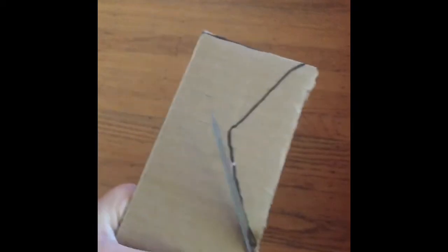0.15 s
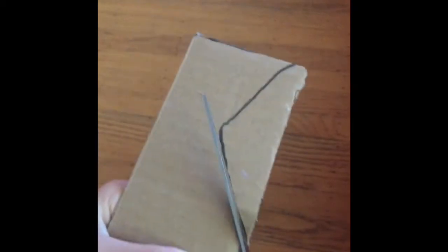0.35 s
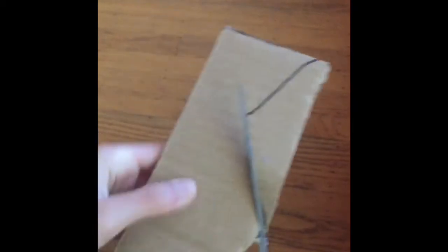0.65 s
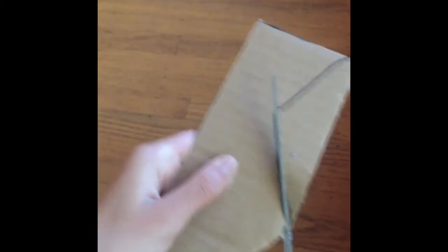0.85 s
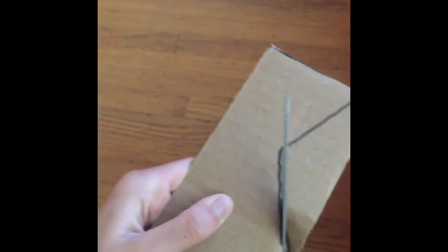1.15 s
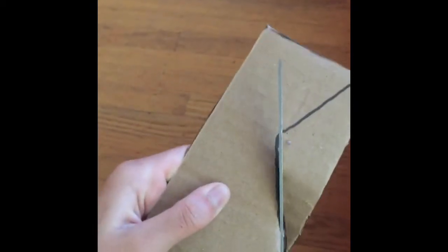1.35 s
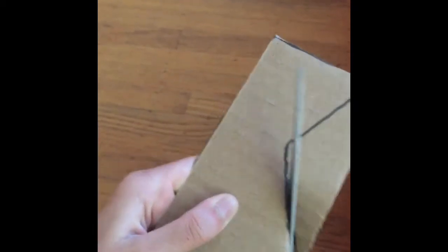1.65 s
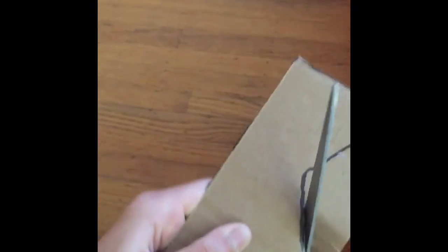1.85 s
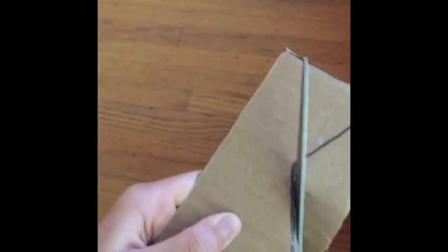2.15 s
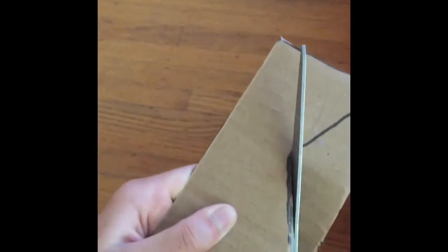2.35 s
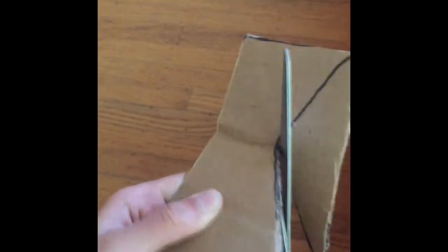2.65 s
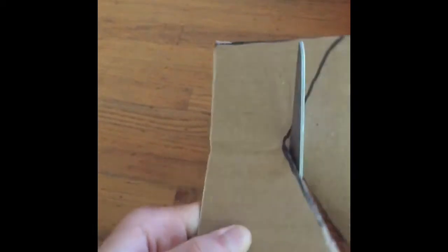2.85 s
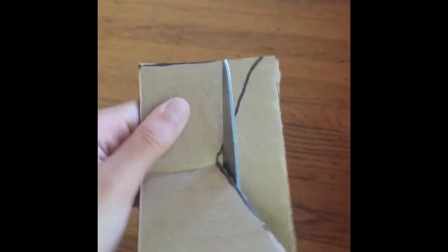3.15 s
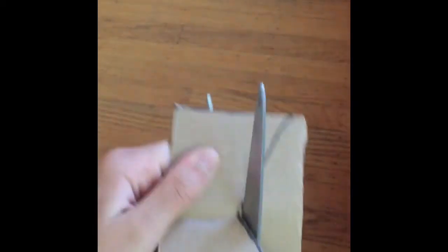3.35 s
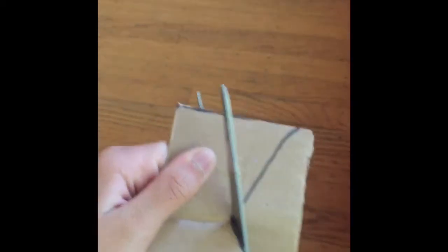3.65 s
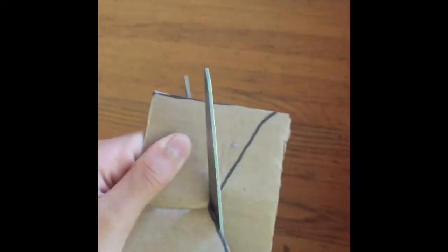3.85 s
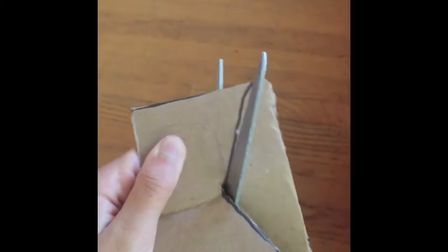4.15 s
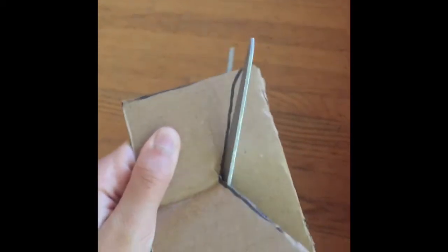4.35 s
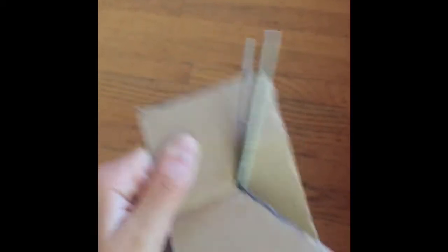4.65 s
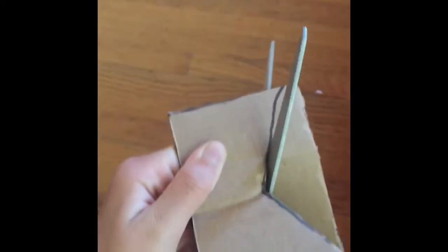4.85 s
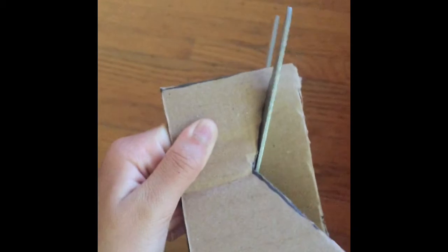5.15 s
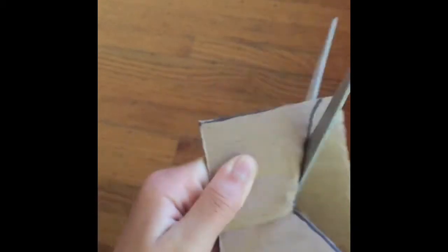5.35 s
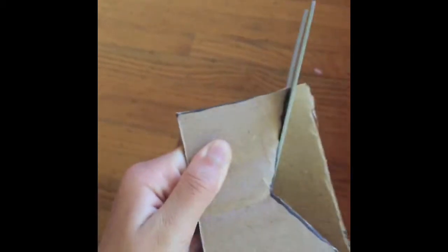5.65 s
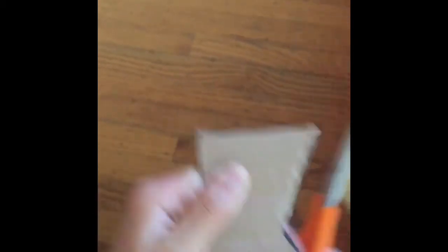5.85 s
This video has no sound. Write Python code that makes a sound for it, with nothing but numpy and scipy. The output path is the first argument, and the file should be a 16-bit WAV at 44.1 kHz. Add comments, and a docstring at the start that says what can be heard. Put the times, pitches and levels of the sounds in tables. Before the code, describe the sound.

Close, dry sound of scissors cutting corrugated cardboard in a small quiet room. A short, bright rasp at 0.1 s leads into a slow crunching cut from 0.4 to 0.7 s, with hard snaps near 0.46. A dull knock at 0.75, a sliding scrape at 0.95, then a fuller crunch from 1.2 to 1.5. A short scrape at 1.7 runs into a snap at 1.86; a long crackling cut follows from 2.15 to 2.5, with metal ticks and a strong snap at 2.38. Handling from 2.6 to 3.2: light scuffs, deep soft thumps, knocks at 2.84 and 3.2, a tiny chirping squeak at 2.95. Rasp at 3.35, then a faint thin squeal and very bright clicks and snap at 3.75-3.85. Swishing rasps at 4.1, 4.7 and 5.3 precede crackling cuts around 4.4, 5.0 and 5.5, the sharpest snap at 5.6. A final snap-cluster at 5.8 ends with papery thumps and knocks.

```python
"""Scissors cutting corrugated cardboard

Steel scissors cut cardboard close by in a quiet room: sliding strokes rasp, closing strokes crunch and snap flutes.
Random fibre impulses and noise bursts drive filters that colour each stroke as the sheet does.
Decaying sines make the flexing sheet's thumps; noise bursts make steel ticks and dull knocks.
Filtered noise gives finger brushes and a thin squeal, a gliding sine gives the bent card's squeak.
A short reverberant tail and a faint noise floor surround them.
"""
import sys
import numpy as np
from scipy import signal
from scipy.fft import rfft, irfft, next_fast_len
from scipy.io import wavfile
from scipy.ndimage import map_coordinates

SR = 44100
rng = np.random.default_rng(int(sys.argv[2]) if len(sys.argv) > 2 else 0)


def materialize(psi):
    """Save the field psi as 16-bit PCM at rate SR to the path in sys.argv[1].

    A 1-D psi becomes a single channel; in a 2-D psi each row is a channel.
    """
    bounded = np.clip(np.atleast_2d(psi).T, -1, 1)
    quanta = np.round(bounded * 32767).astype(np.int16)
    wavfile.write(sys.argv[1], SR, quanta)


N = 264147
TIME = np.arange(N) / SR  # s
HZ = np.fft.rfftfreq(4096, 1 / SR)  # frequency grid of every filter
SPLIT_HZ, TOP_HZ = 4500, 16200  # border of body and hiss; upper band limit

# Strokes in which blade or card slides along the cut edge. Each row: start in seconds, swell in seconds,
# fade in seconds, body level in dB, hiss level in dB, swell depth in dB, fade depth in dB,
# dulling (hiss lost from start to end) in dB, glide of the body's resonances in octaves (negative falls),
# and the sheet's resonances and notches, each with centre in Hz, width in Hz, height in dB.
SLIDE_STROKES = [ (.067, 0.094, 0.073, -38.5, -36, 6, 6, 3.5, -0.018, [(514, 140, 20), (700, 640, -18),
                 (982, 140, 22.5), (1520, 230, 11), (6850, 2300, -4.5), (9400, 760, 6.5),
                 (12600, 1400, 10)]), (0.949, 0.15, 0.033, -37, -42, 3.5, 4, 11.5, -0.025, [(450, 145, -13),
                 (704, 140, 4), (924, 115, -14.5), (1167, 62, 9.5), (1360, 120, -11), (2680, 1380, -0.5)]),
                 (1.675, 0.01, 0.088, -38, -46.5, 6.5, 2, -9.5, -0.24, [(430, 120, -12), (910, 380, 18),
                 (950, 110, -33), (1790, 950, 5.5)]),
                 (2.624, 0.031, .015, -56, -51.5, 2, 7, -3, 1.4, [(3000, 2000, -8), (8700, 3100, -2)]),
                 (2.698, .025, .015, -40.5, -37.5, 5, 8, 0, -0.25, [(1788, 240, -14), (3130, 2300, -11),
                 (8870, 2700, 8.5)]),
                 (2.822, 0.12, 0.023, -40.5, -48.5, 4, 4.5, 12, 1.55, [(510, 1030, 14.5),
                 (1900, 2700, -15)]), (3.324, 0.061, 0.11, -35, -35, 4.5, 15, 3, 0.21, [(287, 570, 6.5),
                 (730, 360, -7.5), (2360, 400, 8), (3810, 470, 8), (5700, 1300, -6.5)]),
                 (3.985, 0.11, 0.12, -33.5, -37, 24.5, 21, 7, 0.12, [(415, 240, 15.5), (770, 270, 14),
                 (1690, 960, 10), (3900, 2000, 16)]),
                 (4.698, 0.033, 0.044, -31.5, -32.5, 7, 7.5, -3.5, -.12, [(406, 340, 18.5), (530, 390, -18),
                 (1144, 86, 7), (3670, 320, 8.5)]),
                 (5.314, 0.019, 0.06, -32.5, -29.5, 7, 7.5, -1, 0.13, [(520, 250, -7), (1050, 300, -5.5),
                 (2200, 750, -8), (5840, 10300, 10)]), ]
# Strokes in which the blades close. Each row: the same columns and units as for the sliding strokes.
CUT_STROKES = [ (.376, 0.004, 0.31, -43, -43, 4, 6.8, 8.5, 0.11, [(314, 166, -20.5), (670, 87, 2),
               (850, 200, -13), (1430, 98, -11), (2860, 840, -13.5), (3780, 720, -13.5)]),
               (1.225, 0.15, 0.14, -32.5, -33.5, 13, 19, 0, 0.59, [(248, 93, 13.5), (443, 287, -33.5),
               (917, 130, 14), (1920, 1400, 0), (5000, 1700, -4.5)]),
               (1.852, .01, 0.073, -41.5, -55, 7, 23.5, -9, 0, [(168, 75, 10.5), (332, 290, -13.5),
               (634, 990, 14.5), (976, 85, -25), (1830, 1000, 9.5)]),
               (2.13, 0.1, 0.257, -43, -44.5, 11.5, 0.91, 6, 0, [(284, 150, 11.5), (480, 170, -10.5),
               (1000, 410, 14.5), (1700, 490, 6), (3060, 310, 5.5)]),
               (3.69, 0.16, 0.042, -52, -47, 13.5, 6.6, -1, 0.29, [(980, 340, -11), (1510, 450, -13),
               (2170, 250, -12), (9300, 2000, -14)]),
               (4.345, 0.075, 0.13, -42, -40.5, 4.5, 3, 9, 0.42, [(305, 380, 1.6), (675, 290, 8.3),
               (1100, 69, 9.5), (5230, 6300, 9.9), (9580, 800, 3.4)]),
               (4.9, 0.16, 0.089, -42, -41.5, 12, 3.5, 2, 0, [(303, 120, 19), (744, 155, -16),
               (870, 330, 15.5), (1130, 220, -9.5), (2000, 1500, -3)]),
               (5.445, 0.13, 0.095, -43, -41, 11.5, 2.4, 2, 0, [(206, 78, 9), (400, 410, -9.5),
               (825, 170, 4.5), (1265, 340, -15.5), (1835, 160, 7), (10000, 6600, 2)]),
               (5.776, .015, 0.091, -47, -52, 0.5, 11, 3, 0, [(298, 160, -2), (1280, 1500, -9.5),
               (4300, 500, 5.5), (6160, 1000, 9), (11650, 3200, 11)]), ]
# Flutes give way. Each row: time in seconds, length in seconds, body level in dB, hiss level in dB.
FLUTE_SNAPS = [(0.379, 0.021, -41, -35.5), (0.459, 0.0056, -22.5, -25), (0.4814, 0.0069, -27, -27.5),
               (0.5086, .0085, -39.5, -36.5), (.559, 0.0066, -31.5, -29), (0.639, 0.0024, -39.5, -37),
               (0.684, 0.0042, -44, -43), (0.974, .0013, -25.5, -31.5), (1.232, 0.002, -38, -35),
               (1.3, 0.02, -41, -32.5), (1.3837, 0.0091, -29, -29), (1.4386, 0.008, -34.5, -43.5),
               (1.459, 0.0022, -31, -29.5), (1.464, 0.015, -39, -41), (1.498, 0.0053, -40, -42.5),
               (1.675, .01, -39, -36.5), (1.725, 0.0032, -29.5, -38), (1.855, 0.009, -26.5, -25),
               (1.867, 0.008, -26, -29), (2.165, 0.0087, -34.5, -31.5), (2.188, 0.0073, -41, -39),
               (2.2083, 0.0068, -42, -36.5), (2.235, 0.01, -38.5, -33), (2.261, .007, -34, -36),
               (2.283, .006, -50, -44), (2.309, 0.0058, -46, -47), (2.3282, .0027, -30.5, -28),
               (2.3805, 0.0058, -23, -23.5), (2.4512, 0.0056, -29, -27.5), (2.495, 0.0051, -39.5, -48),
               (3.8227, .0066, -27.5, -17.5), (3.849, 0.0074, -41, -32), (4.3437, 0.0079, -43.5, -40),
               (4.472, 0.015, -44, -38), (4.4866, 0.0048, -23.5, -23.5), (4.537, 0.0062, -32.5, -30.5),
               (4.555, 0.015, -38, -35.5), (4.9692, 0.0097, -27.5, -28.5), (5.076, .0093, -28, -34),
               (5.115, 0.0091, -46, -56), (5.156, .005, -38.5, -34.5), (5.4847, 0.0012, -29, -24.5),
               (5.5265, 0.011, -29.5, -26.5), (5.565, 0.0074, -37, -33.5), (5.6054, 0.0035, -19.5, -20.5),
               (5.7776, 0.004, -30, -25), (5.7902, 0.0049, -24.5, -20), (5.801, 0.0022, -32, -25)]
# The sheet flexes. Each row: start in seconds, nominal peak in dB, frequency in Hz, 60 dB decay time in seconds.
SHEET_THUMPS = [(0.48, -30, 124, 0.14), (0.562, -29, 178, 0.071), (1.863, -23.5, 84, 0.083),
                (2.167, -38.5, 238, 0.088), (2.38, -25.5, 268, 0.042), (2.384, -41.5, 135, 0.33),
                (2.448, -29.5, 86, 0.11), (2.803, -28.5, 47.6, 0.24), (3.205, -38, 108, 0.19),
                (3.334, -27.5, 48.3, 0.22), (3.401, -22, 276, 0.03), (3.823, -38, 154, 0.13),
                (3.86, -41, 59, 0.37), (4.493, -35, 124, 0.23), (4.504, -18.5, 294, 0.031),
                (4.973, -36, 280, 0.052), (5.08, -21, 305, 0.054), (5.446, -38, 218, 0.088),
                (5.533, -36.5, 195, 0.13), (5.826, -25.5, 182, 0.044), (5.869, -30, 190, 0.048)]
# The scissors knock against the card. Each row: start in seconds, peak in dB.
CARD_KNOCKS = [(0.745, -31), (2.838, -24.5), (3.2083, -24), (4.829, -24.5), (4.858, -32.5), (5.826, -20),
               (5.868, -24)]
# Fingers shift on the card, barely heard. Each row: start in seconds, length in seconds, nominal level in dB.
FINGER_BRUSHES = [(0.311, 0.052, -55), (0.714, 0.19, -61), (1.995, 0.043, -57), (3.031, 0.14, -60.5)]
# The steel edges catch on each other. Each row: start in seconds, nominal level in dB.
EDGE_TICKS = [(0.3336, -29.5), (2.115, -25.5), (2.2314, -13.5), (2.4743, -19), (3.674, -32),
              (3.7485, -11.5), (3.8419, -8.5), (3.8703, -25), (3.897, -28), (4.2192, -34), (4.2976, -30),
              (4.3625, -11), (4.4077, -20.5), (4.6324, -39), (4.6694, -30), (5.184, -23), (5.293, -33.5)]
# The bent card chirps. Each row: time in seconds, level in dB, mean frequency in Hz.
CHIRP_PATH = [(2.92, -44, 598), (2.942, -41, 642), (2.947, -21, 680), (2.953, -23.5, 703),
              (2.957, -28.5, 770), (2.99, -75, 686)]
# The closing blades squeal. Each row: time in seconds, level in dB.
SQUEAL_LEVELS = [(3.61, -93), (3.625, -58.5), (3.8, -53), (3.82, -74)]
# Resonances of that squeal. Each row: centre in Hz, half width in Hz, level in dB.
SQUEAL_RESONANCES = [(1336, 81, -3.5), (420, 33, -9.5)]
# Spectra of sliding, cutting, a knock and the noise floor. Each row: frequency in Hz, relative density in dB per Hz.
SLIDE_COLOUR = [(60, -6), (150, -7), (270, -14.5), (450, -7.5), (800, -3.5), (1800, 4.5), (3300, -2),
                (5000, -14.5), (7000, -11.5), (10000, -12.5), (13500, -18), (15700, -25.5)]
CUT_COLOUR = [(60, -2), (150, -1.5), (270, -5), (450, -6), (800, -8), (1800, -4.5), (3300, -3),
              (5000, -8.5), (7000, -5.5), (10000, -4), (13500, -5.5), (15700, -14)]
KNOCK_COLOUR = [(80, -10.5), (600, 2), (1150, -4.5), (1900, -8), (3000, -7.5), (16000, -26)]
FLOOR_COLOUR = [(20, -33), (45, -2.5), (115, -4.5), (700, -29), (1200, -25), (4800, -31), (12000, -31.5),
                (16000, -32.5)]
# The hand's push when sliding and when cutting. Entries: attack in seconds, bite in dB, arch as an exponent
# (1 = straight ramps), share of the effort's dB that the hiss follows, release in dB per second.
SLIDE_PUSH = dict(attack_s=.008, bite_db=12.5, arch=1.3, hiss_follows=1.11, release_db_per_s=491)
CUT_PUSH = dict(attack_s=.012, bite_db=15.5, arch=0.65, hiss_follows=0.9, release_db_per_s=487)

SHEET_RING_S = 0.11  # time computed past the end of a stroke
TICK_T60_S, TICK_CREST_DB, TICK_LOW_HZ = 0.0023, 1, 5000
TICK_RING_DB, TICK_RING_T60_S = -13, 0.021  # the blades shiver briefly after each catch
CHATTER_PER_S, CHATTER_DB, CHATTER_SCATTER_DB = 8, -42, 1  # fainter catches while the blades close


def cutting():
    """Brittle fracture: fibres part in uneven clumps and small tears, a dry crunch."""
    # rates per second
    grain = dict(rate=7400, scatter_db=6.5, clump_db=3.5, judder_rate=220, judder_db=3.0,
                 tear_rate=85, tear_db=-1.5, tear_s=0.0034)
    return sum(stroke(movement, CUT_COLOUR, grain, CUT_PUSH) for movement in CUT_STROKES)


def sliding():
    """Friction: dense, even slips make a smooth rasp with a few small catches."""
    # rates per second
    grain = dict(rate=16000, scatter_db=1.5, clump_db=1.0, judder_rate=170, judder_db=1.5,
                 tear_rate=15, tear_db=-6, tear_s=0.00075)
    return sum(stroke(movement, SLIDE_COLOUR, grain, SLIDE_PUSH) for movement in SLIDE_STROKES)


def stroke(row, spectrum, grain, hand):
    """Source and filter: fibre crackle and snaps are radiated as the sheet's body and the edge's hiss."""
    start, swell_s, fade_s, body_db, hiss_db, swell_db, fade_db, dulling_db, glide, colour = row
    end = start + swell_s + fade_s
    t = np.arange(start - 2 * hand["attack_s"], end + SHEET_RING_S, 1 / SR)
    effort_db = push(t, start, swell_s, fade_s, swell_db, fade_db, hand)
    progress = np.interp(t, [start, end], [-1 / 2, 1 / 2])
    body_level_db = body_db + effort_db
    hiss_level_db = hiss_db + hand["hiss_follows"] * effort_db - dulling_db * progress

    resonances_db = sum(db / (1 + (2 * (HZ - hz) / width) ** 2) for hz, width, db in colour)
    # The many higher modes ripple differently in every stroke
    crowded_modes_db = 2.4 * wobble(SR / 13, len(HZ)) * HZ / (HZ + 500) / np.hypot(1, HZ / 8000)
    sheet = amp(along(spectrum) + resonances_db + crowded_modes_db)
    body_share = 1 / (1 + (HZ / SPLIT_HZ) ** 12)
    hiss_share = (1 - body_share) * (HZ < TOP_HZ + 500)

    # Stick and slip shakes both bands
    judder = unit(amp(grain["judder_db"] * wobble(grain["judder_rate"], len(t))))
    judder = judder * tears(len(t), grain)
    bands = [(body_level_db, body_share, .22, glide), (hiss_level_db, hiss_share, 0, 0)]
    sound = 0
    for band, (level_db, share, woodiness, band_glide) in enumerate(bands):
        crackle = fibres(len(t), grain["rate"], grain["scatter_db"], 900, grain["clump_db"])
        force = crackle * judder * amp(level_db)
        for at, length, *snap_db in FLUTE_SNAPS:
            if t[0] <= at < end + hand["attack_s"]:
                add(force, at - t[0] - length, amp(snap_db[band]) * burst(length, woodiness))
        sound = sound + radiate(force, sheet, np.sqrt(share), band_glide)
    track = np.zeros(N)
    add(track, t[0], sound)
    return track


def push(t, start, swell_s, fade_s, swell_db, fade_db, hand):
    """Applied force, in dB under its peak: the blades bite, the push swells and fades, the hand lets go."""
    peak, end = start + swell_s, start + swell_s + fade_s
    swell = swell_db * np.clip((peak - t) / swell_s, 0, 1) ** hand["arch"]
    fade = fade_db * np.clip((t - peak) / fade_s, 0, 1) ** hand["arch"]
    attack = hand["bite_db"] * np.maximum(start - t, 0) / hand["attack_s"]
    release = hand["release_db_per_s"] * np.maximum(t - end, 0)
    return -(attack + swell + fade + release)


def fibres(size, rate, scatter_db, clump_rate, clump_db):
    """Random impulse process: tiny breaks or slips of fibres, uneven in size and swelling in clumps; rms 1."""
    breaks = (rng.random(size) < rate / SR) * rng.choice([-1, 1], size)
    sizes_db = scatter_db * rng.standard_normal(size) + clump_db * wobble(clump_rate, size)
    return unit(breaks * amp(sizes_db))


def tears(size, grain):
    """Relaxation: each small tear raises the force at a random moment, then dies away; rms 1."""
    happens = rng.random(size) < grain["tear_rate"] / SR
    jumps = happens * amp(grain["tear_db"] + 1.47 * rng.standard_normal(size))
    memory = np.exp(-1 / (grain["tear_s"] * SR))
    return unit(1 + signal.lfilter([1], [1, -memory], jumps))


def burst(length, woodiness):
    """Avalanche: breaks swell fast, die slower and ring their flute; energy of rms 1 over one length."""
    u = np.arange(int(3 * length * SR) + 2) / (length * SR) - 3 / 2  # time in lengths
    crackle = rng.standard_normal(len(u)) / (np.exp(-u / 0.32) + np.exp(u / 0.41))
    flute_hz = np.clip(1500 * 2 ** (.5 * rng.standard_normal()), 750, 6000)
    flute = signal.lfilter(*signal.iirpeak(flute_hz, 3, fs=SR), crackle)
    crackle = unit(crackle) + woodiness * unit(flute)
    return unit(crackle) / np.sqrt(3)  # the burst spans three lengths


def radiate(force, gain, share, glide):
    """Resonant radiation: modes shift by glide octaves during the stroke, up or down."""
    if glide == 0:
        return signal.fftconvolve(force, response(gain * share))
    stages = np.linspace(-1 / 2, 1 / 2, 9)
    progress = np.linspace(-1 / 2, 1 / 2, len(force))
    sound = 0
    for stage, weight in zip(stages, np.eye(len(stages))):
        crossfade = np.interp(progress, stages, weight)
        shifted = np.interp(HZ / 2 ** (glide * stage), HZ, gain)
        sound = sound + signal.fftconvolve(force * crossfade, response(shifted * share))
    return sound


def ticks():
    """Impact of edge on edge: tiny bright clicks, with a faint random chatter during the cuts."""
    track, t = np.zeros(N), np.arange(SR // 50) / SR
    decay = amp(-60 * t / TICK_T60_S) + amp(TICK_RING_DB - 60 * t / TICK_RING_T60_S)
    chatter = []
    for start, swell_s, fade_s, *_ in CUT_STROKES:
        for _ in range(int(CHATTER_PER_S * (swell_s + fade_s))):
            at = rng.uniform(start, start + swell_s + fade_s)
            chatter.append((at, rng.normal(CHATTER_DB, CHATTER_SCATTER_DB)))
    for s, db in list(EDGE_TICKS) + chatter:
        add(track, s, amp(db - TICK_CREST_DB) * decay * rng.standard_normal(len(t)))
    return signal.sosfilt(signal.butter(2, TICK_LOW_HZ, "highpass", fs=SR, output="sos"), track)


def thumps():
    """Free bending vibration: the released sheet swings in a low mode with a weaker, shorter overtone."""
    track, t = np.zeros(N), np.arange(SR // 2) / SR
    for s, db, hz, t60 in SHEET_THUMPS:
        overtone = 0.26 * np.sin(2 * np.pi * 1.607 * hz * t) * amp(-30 * t / t60)
        swing = np.sin(2 * np.pi * hz * t) + overtone
        onset = 1 - np.exp(-t * hz / 0.48)
        # 1 dB makes up for the soft onset
        add(track, s, amp(db + 1.0 - 60 * t / t60) * onset * swing)
    return track


def knocks():
    """Damped impact: dull taps of steel on card, rattling for a few milliseconds."""
    track, t = np.zeros(N), np.arange(SR // 20) / SR
    card = response(amp(along(KNOCK_COLOUR)))
    for s, db in CARD_KNOCKS:
        rattle = rng.standard_normal(len(t)) * amp(-60 * t / 0.021)
        tap = signal.fftconvolve(rattle, card)
        add(track, s, amp(db) * tap / np.abs(tap).max())
    return track


def squeaks():
    """Stick-slip oscillation: the bent card chirps against the blade; later the closing blades squeal thinly."""
    s, db, hz = np.transpose(CHIRP_PATH)
    unsteady_hz = np.interp(TIME, s, hz) * (1 + 0.04 * wobble(300, N))
    chirp = envelope(s, db) * np.sin(2 * np.pi * np.cumsum(unsteady_hz) / SR)
    squeal_gain = sum(amp(level) / (1 + ((HZ - centre) / half_width) ** 2)
                      for centre, half_width, level in SQUEAL_RESONANCES)
    squeal = envelope(*np.transpose(SQUEAL_LEVELS)) * noise(squeal_gain)
    return chirp + squeal


def brushes():
    """Friction noise: soft rubs of skin on the liner under an uneven pressure."""
    pressure = np.zeros(N)
    for s, length, db in FINGER_BRUSHES:
        add(pressure, s, amp(db) * np.sqrt(np.abs(np.hanning(int(length * SR)))))
    return pressure * amp(3.5 * wobble(140, N)) * noise(amp(along(CUT_COLOUR)))


def room(x):
    """Reverberation: a small room's diffuse tail starts after a short gap and dulls as it dies."""
    hz, t, z = signal.stft(rng.standard_normal(SR // 2), SR, nperseg=256)
    t60 = np.interp(hz, [200, 3000, 15000], [.3, .27, .17])  # Hz to s
    tail = signal.istft(z * amp(-60 * t / t60[:, None]), SR, nperseg=256)[1]
    tail = np.pad(tail / np.linalg.norm(tail), (int(0.0066 * SR), 0))
    return signal.oaconvolve(x, tail)[:N]


def background():
    """Coloured noise, slowly wavering in level: the room's faint rumble and hiss."""
    return amp(-61.5 + 2.5 * wobble(3, N)) * noise(amp(along(FLOOR_COLOUR)))


def amp(db):
    """Logarithmic level: decibels to gain."""
    return 10 ** (np.asarray(db) / 20)


def unit(x):
    """Normalisation: scale to rms 1."""
    return x / np.sqrt(np.mean(x ** 2) + 1e-20)


def along(points):
    """Interpolation: (Hz, value) points joined on a log frequency axis."""
    f, v = np.transpose(points)
    return np.interp(np.log(HZ + 1), np.log(f), v)


def envelope(s, db):
    """Amplitude envelope: gain per sample through (s, dB) points, silent outside them."""
    return amp(np.interp(TIME, s, db, left=-150, right=-150))


def wobble(rate, size):
    """Band-limited fluctuation: a smooth random curve, rate knots a second."""
    knots = rng.standard_normal(int(size * rate / SR) + 4)
    return map_coordinates(knots, [np.arange(size) * rate / SR])


def response(gain):
    """Minimum phase: causal impulse response of energy 1 with this relative gain over frequency."""
    cepstrum = irfft(np.log(np.maximum(gain / gain.max(), 1e-5)))
    half = len(cepstrum) // 2
    # Folding the cepstrum onto positive times makes the response causal
    cepstrum[1:half] *= 2
    cepstrum[half + 1:] = 0
    h = irfft(np.exp(rfft(cepstrum)))
    return h / np.linalg.norm(h)


def noise(gain):
    """Filtered white noise: steady, of rms 1, in this colour."""
    return unit(signal.oaconvolve(rng.standard_normal(N), response(gain))[:N])


def add(track, s, sound):
    """Superposition: mix a sound into the track at time s."""
    room_left = track[max(round(s * SR), 0):][:len(sound)]
    room_left += sound[:len(room_left)]


def scene():
    """Direct and reverberant field: scissors and card close by, their weaker reverberation, and the noise floor."""
    near = cutting() + sliding() + ticks() + thumps() + knocks() + squeaks() + brushes()
    return (near + amp(-20.5) * room(near) + background())[None]


def record(dry):
    """Band limitation: the recorder weakens the deepest bass and cuts steeply above its upper limit."""
    size = next_fast_len(N + SR // 4)
    hz = np.fft.rfftfreq(size, 1 / SR)
    lean = signal.sosfilt(signal.butter(3, 38, "highpass", fs=SR, output="sos"), dry)
    return irfft(rfft(lean, size) / np.sqrt(1 + (hz / TOP_HZ) ** 200), size)[:, :N]


dry = scene()
out = record(dry)
materialize(out)
```